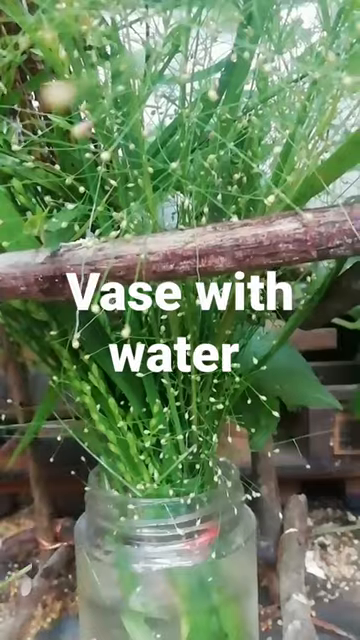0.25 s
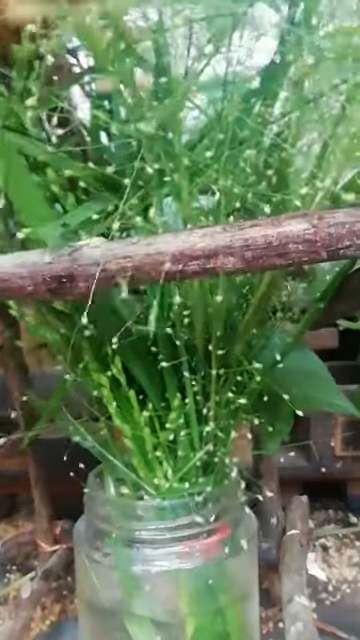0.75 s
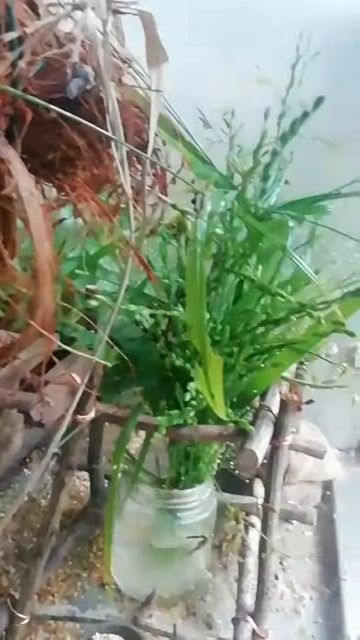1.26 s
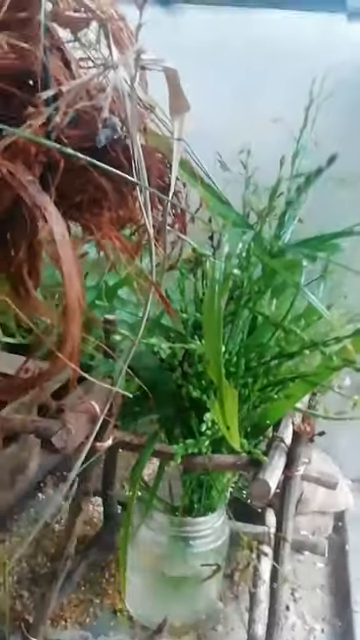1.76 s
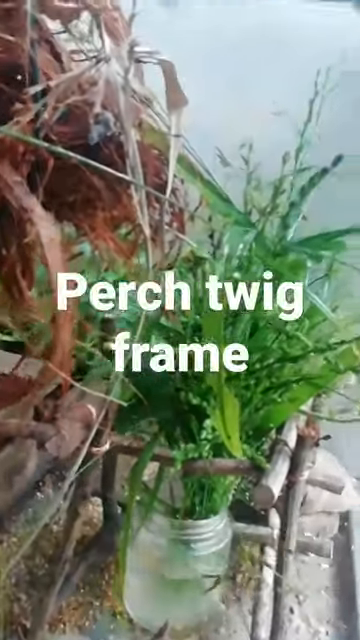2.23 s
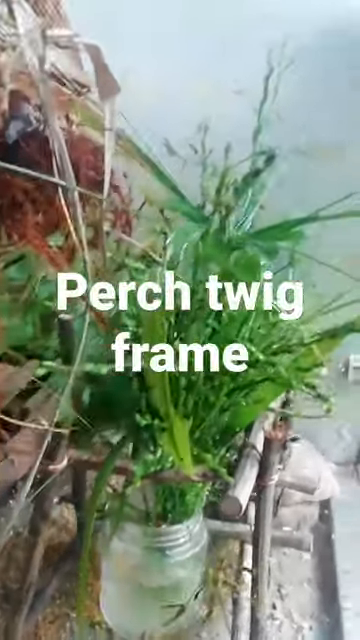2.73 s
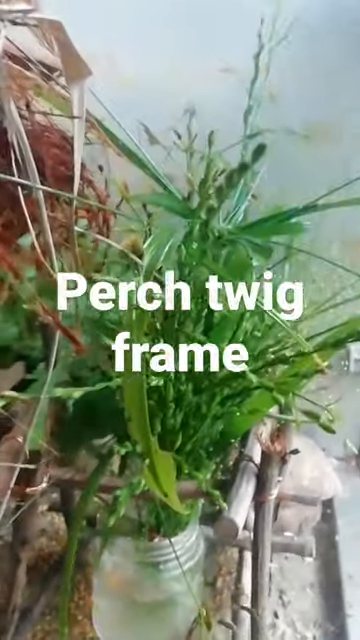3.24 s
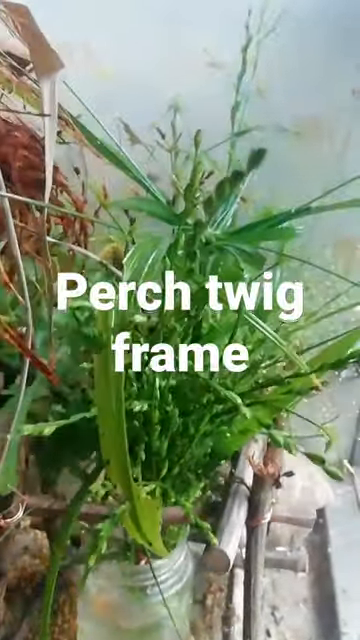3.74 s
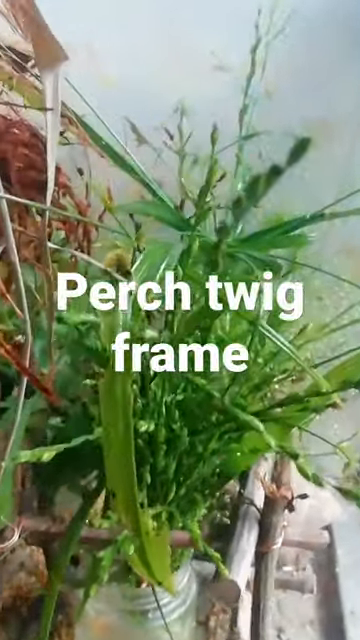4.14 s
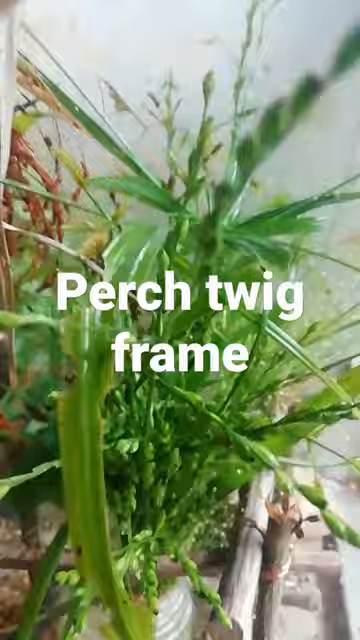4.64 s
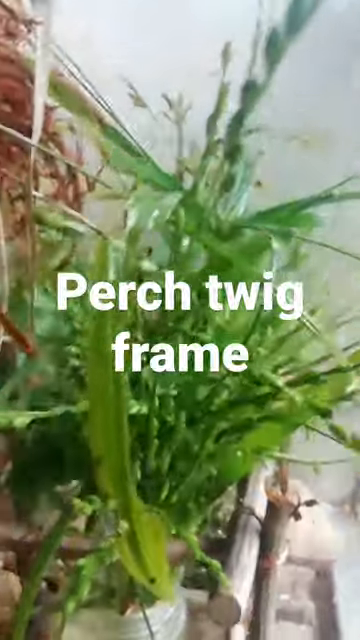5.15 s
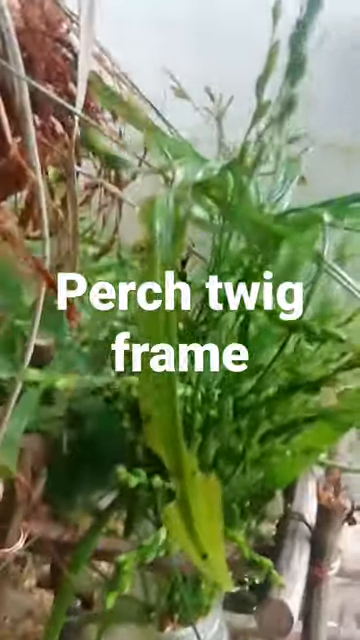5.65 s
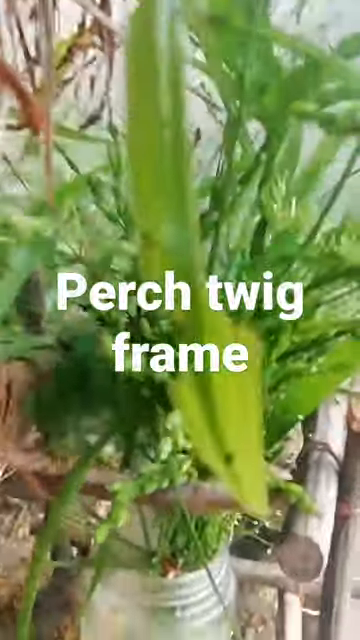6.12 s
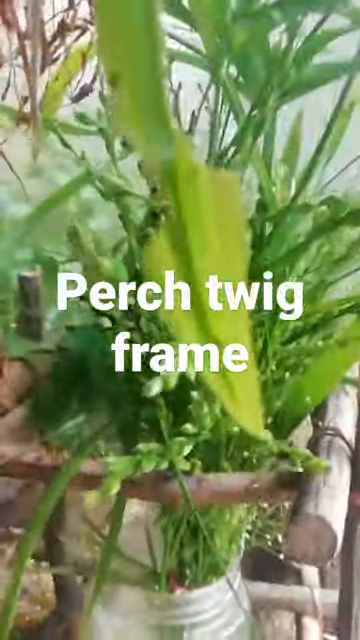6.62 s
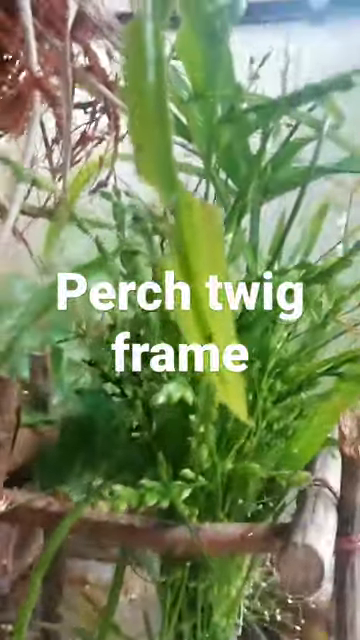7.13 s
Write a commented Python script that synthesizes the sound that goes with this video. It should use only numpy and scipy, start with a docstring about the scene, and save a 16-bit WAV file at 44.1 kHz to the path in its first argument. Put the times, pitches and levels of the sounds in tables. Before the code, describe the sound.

A soft outdoor wash and low rumble lie under sparse, quiet finch cheeps and dry stem rustles. A sudden silent gap follows, then the ambience restarts with a soft low bump. Rustling thickens with small wooden knocks, and the birds become louder: brief buzzy calls between high squealing phrases ending in raspy, reedy syllables. Close, dry stereo with a very short echo; the last squeal is cut off.

```python
"""Finches sing in a small aviary: buzzy pulse-stack notes, high squeals of three partials, the upper two
throbbing, with hoarse tails, clean harmonic stacks, some of them falling, and cheeps.
Birds rustle in dry grass as noise bursts with dull knocks; thin near-sines whistle or hum low.
Shaped noise makes the rumble, outdoor wash, leaves, a band of hiss, one dull scuff and one gust.
The recorder pauses once, leaving a silent gap, and restarts with a slowly settling offset."""
import sys
import numpy as np
from scipy import signal
from scipy.fft import rfft, irfft
from scipy.io import wavfile
from scipy.ndimage import uniform_filter1d

SR = 44100
rng = np.random.default_rng(int(sys.argv[2]) if len(sys.argv) > 2 else 0)


def transcribe(u):
    """Save the signal u as a 16-bit wav file named by the first command-line argument.

    u: samples, shape (n,) or (channels, n), limited to [-1, 1]; the rate is SR.
    q: integer samples, one column per channel.
    """
    v = np.clip(np.atleast_2d(u).T, -1, 1)
    q = np.round(v * 32767).astype(np.int16)
    wavfile.write(sys.argv[1], SR, q)


N = 325458

# Left-right values in dB are positive towards the left.
# Level curves of the steady noise layers. Each row: time in seconds, level in dB.
RUMBLE_LEVEL = [(0.0, -55.5), (1.2, -55.5), (1.75, -53.5), (2.9, -56), (3.6, -53.5), (4.3, -54.5),
                (5.8, -57), (6.25, -54), (6.55, -56.5), (7.3, -55)]
WASH_LEVEL = [(0.0, -48.5), (1.8, -47), (2.1, -52), (3.3, -48), (5.0, -47.5), (6.1, -49), (7.38, -49)]
LEAVES_LEVEL = [(0.0, -51), (1.8, -49), (3.2, -53.5), (4.8, -48), (6.1, -51), (6.7, -45.5), (7.0, -53.5),
                (7.38, -45.5)]
HISS_LEVEL = [(0, -49), (.25, -47), (.4, -52), (.5, -49), (.6, -48.5), (.66, -45), (.74, -55), (.82, -44),
              (.9, -48), (1.02, -45), (1.08, -50), (1.2, -49.5), (1.59, -46), (1.8, -52.5), (3, -53.5),
              (4.3, -56), (7.38, -65)]
# Relative spectra of the noise layers. Each row: frequency in Hz, density in dB per Hz.
RUMBLE_SPECTRUM = [(12, -52), (20, -13), (48, 3.5), (153, -3.5), (226, -11), (283, -7.5), (321, -9.5),
                   (560, -12), (730, -58.5), (1230, -120)]
WASH_SPECTRUM = [(240, -38.5), (400, -8.5), (499, -23), (678, -4.5), (912, -1.5), (1600, -7.5),
                 (2170, -6.5), (2290, -8.5), (5000, -11.5), (6500, -18.5), (11000, -120)]
LEAVES_SPECTRUM = [(2350, -9.5), (4000, -14), (4610, -7), (5050, -9), (8090, 1.5), (9480, -7),
                   (14400, -22.5), (15500, -79)]
HISS_SPECTRUM = [(900, -19.5), (1250, -1.5), (1600, 3), (1950, -2), (2400, -28)]
SCUFF_SPECTRUM = [(300, -41.5), (500, -1), (800, -3), (1400, -15.5), (2200, -41)]
GUST_SPECTRUM = [(30, -30.5), (60, -5.5), (150, -9), (300, -16.5), (450, -20.5), (900, -63), (2000, -110)]
# Stereo likeness of the noise layers. Each row: frequency in Hz, left-right likeness from 0 to 1.
LIKENESS = [(60, 0.99), (150, 0.98), (290, 1), (640, 0.5), (1400, 0.028), (3100, 0.14), (7000, 0.024),
            (15000, 0.045)]
# Stereo balance of the noise layers. Each row: frequency in Hz, left-right in dB.
BALANCE = [(60, 0), (150, 0), (300, -2.5), (600, .5), (1200, -3), (2400, -1.5), (5000, -1), (8000, 1),
           (15000, 0)]
# Swells of the scuff and the gust. One row: level in dB, rise in dB per second, fall in dB per second.
SCUFF_SWELL_RATES = (-47.5, 800, 420)
GUST_SWELL_RATES = (-42, 130, 110)
# Grass rustles. Each row: start in seconds, crackle level in dB before it dies, knock in dB against the
# crackle, time to fall 60 dB in seconds.
GRASS_RUSTLES = [(0.189, -38.5, -9, 0.075), (0.4494, -43, 0, 0.055), (0.638, -44, -9, 0.08),
                 (.799, -50, 6, 0.16), (1.9498, -39, -4, 0.044), (2.163, -42.5, -1, 0.1),
                 (2.3234, -40.5, -2.5, 0.08), (2.4442, -41, 1, 0.11), (2.5777, -37, -3, 0.15),
                 (2.6424, -43, -9, 0.5), (2.7, -41.5, -2, 0.15), (2.8577, -47, 2, 0.44),
                 (3.1451, -44, -3, 0.4), (3.2315, -40.5, -4, 0.24), (3.2693, -37, 0, 0.18),
                 (3.318, -43, 0, 0.29), (3.4165, -41.5, -22, 0.12), (3.453, -43.5, 2.5, 0.42),
                 (3.471, -28, -35, 0.056), (3.483, -38.5, -23, 0.4), (3.7842, -43, 1, 0.19),
                 (3.8567, -46, 2.5, 0.26), (3.997, -42.5, 2, 0.15), (4.242, -37.5, 3, 0.028),
                 (4.436, -39.5, -0.5, 0.44), (4.631, -37.5, -1, 0.1), (4.7914, -37.5, -6, 0.44),
                 (4.87, -38, -8, 0.16), (5.308, -39.5, -4, 0.12), (5.45, -37, -2, 0.12),
                 (5.778, -43.5, 0, 0.25), (5.9987, -44, -25, 0.062), (6.6258, -44, -5, 0.21)]
# Tone colour of dry grass and of the knocking perch. Each row: frequency in Hz, gain in dB.
GRASS_COLOUR = [(3000, -15), (5500, -4), (7500, 7.5), (9500, -2.5), (12000, -13), (15500, -27)]
PERCH_COLOUR = [(500, -25.5), (1000, -10), (1700, -6), (2500, -13), (4500, -12.5), (7000, -33.5)]
# Thin whistling tones, one of them a second high voice beside the last squeal, and low tones.
# Each row: start in seconds, length in seconds, first pitch in Hz, last pitch in Hz, level in dB,
# left-right in dB.
THIN_WHISTLES = [(0.634, 0.04, 2146, 2080, -46.5, 8), (1.087, 0.028, 3100, 3120, -53.5, 11),
                 (1.78, 0.047, 4020, 3970, -53.5, -5), (2.718, 0.062, 2170, 1910, -55, -16),
                 (3.064, 0.2, 4600, 4520, -58, -5), (3.252, 0.11, 1376, 1416, -51, 0),
                 (3.264, 0.035, 1920, 2030, -47, 0), (4.482, 0.079, 6000, 6120, -48, -11),
                 (4.531, 0.093, 6040, 5800, -49, -11), (5.112, 0.023, 4750, 4720, -42, -7),
                 (5.14, 0.031, 4650, 4870, -50, -7), (7.33, .04, 5550, 5830, -35, 10),
                 (5.403, 0.071, 3590, 3530, -57, -3), (5.639, 0.13, 4050, 3800, -54, -15),
                 (6.265, 0.043, 2115, 1820, -46.5, -9)]
LOW_HUMS = [(0.198, 0.12, 289.4, 278, -58.5, -1), (0.797, 0.044, 292, 286, -50.5, -1),
            (1.14, 0.09, 295, 290, -55, -1), (5.04, 0.17, 200.4, 194, -54, -3),
            (6.684, 0.04, 470, 468, -48, -10), (7.039, 0.12, 367, 337, -51.5, -7),
            (7.19, 0.044, 278, 316, -52, -2), (7.19, 0.078, 110, 101, -49, 0)]
# Throat colour. Each row: frequency in Hz, gain in dB.
THROAT_COLOUR = [(500, -27.5), (1100, -2), (1800, -10), (2400, -1), (2900, -5), (3400, -9.5), (4100, -2.5),
                 (5100, -7), (6100, -3.5), (7200, -11.5), (8200, -9.5), (9500, -12.5), (13000, -46)]
# Single calls and opening notes. Each row: start in seconds, length in seconds, level in dB,
# early roughness from 0 to 1, beak resonance in Hz, left-right in dB, thinning below 4 kHz in dB per octave.
CHIRP_NOTES = [(0.561, 0.037, -43.5, 0.4, 4840, -2, -2), (0.794, .04, -55, 0.4, 3200, -10, -9),
               (.965, 0.032, -51, 0.46, 3100, -5, 8), (1.125, 0.041, -43, 0.05, 4300, 5, 0),
               (2.969, 0.05, -42, 1.03, 4040, 0, -3), (3.013, 0.039, -30.5, 0.32, 4400, 1.5, -1),
               (3.151, 0.016, -38.5, 0.6, 4300, 11.5, 7), (3.232, 0.069, -40, 0.6, 4600, 0.5, 1),
               (3.341, 0.011, -34.5, 0.87, 4380, 4, 4), (3.486, 0.054, -34, 0.41, 4100, 2.5, 1),
               (3.923, 0.037, -37, 0.77, 4530, 0.5, -0.5), (4.019, 0.034, -36, 0.77, 4740, -1, -2.5),
               (4.118, 0.048, -43.5, 0.46, 4120, 1, -4), (4.166, 0.038, -32.5, 0.1, 4800, -4, 3),
               (4.616, 0.044, -40, 0.26, 4140, -4, -2.5), (4.73, 0.056, -40.5, 0.44, 2290, -5, 4),
               (4.78, 0.05, -33.5, 0.19, 4700, -3.5, 2.5), (5.574, 0.053, -35.5, 0.34, 3870, -2, 1),
               (6.096, 0.051, -46, 0.96, 3300, -1, 1), (6.144, 0.047, -32, 0.67, 4200, -0.5, 3),
               (6.477, 0.052, -46, 0.8, 2780, -1, -2), (6.536, 0.027, -37, 0.44, 4250, 5, 6),
               (6.951, 0.027, -38, 0.37, 4540, -2, 0), (7.042, 0.033, -37.5, 0.44, 3040, -1.5, 1.5),
               (7.148, 0.052, -42.5, 0.7, 3740, 1, -1.5), (7.2, 0.033, -32, 0.38, 5050, 1, 8)]
# Pitch of each chirp, one value in Hz per note.
CHIRP_PITCHES = [570, 588, 610, 588, 602, 583, 522, 551, 484, 564, 601, 617, 615, 572, 590, 594, 562, 478,
                 610, 588, 606, 577, 588, 588, 567, 565]
# Squeal that opens each song phrase. Each row: start in seconds, squeal length in seconds, rise in seconds,
# octave partial in dB, its swell in dB, lead-in pitch in Hz, body pitch in Hz, fundamental in dB,
# third partial in dB, lead-in in seconds, pitch settling in seconds, midway pitch dip as a share,
# throb depth from 0 to 1, throbs per second, left-right in dB.
SQUEALS = [(3.618, 0.045, 0.0046, -27.5, 2, 2756, 2580, -39, -36.5, 0.0091, 0.014, .008, 0.28, 69, 4),
           (4.301, 0.042, 0.011, -24.5, 1.5, 2680, 2541, -22.5, -30.5, 0.0062, .014, 0.017, 0.27, 85, -7.5),
           (4.914, 0.036, 0.0067, -24, 1.5, 2750, 2570, -27, -32, 0.0089, 0.014, 0.015, 0.4, 156, -3.5),
           (6.658, 0.0335, 0.0043, -19.5, 11, 2970, 2605, -38, -26, .008, 0.0069, 0.0033, 0.45, 56, -0.5),
           (7.342, 0.02, 0.006, -21.5, 7, 2950, 2523, -33.5, -26.5, 0.016, 0.018, 0.0049, 0.24, 106, 4)]
# Hoarse syllables after a squeal. Each row: delay in seconds, length in seconds, pitch sag as a share over
# 0.56 of the note, late roughness from 0 to 1, arch power, treble fading as the beak closes in dB per octave.
SYLLABLES = [(.025, .052, 0, .6, .7, 6), (.128, .03, .02, .8, .7, 6), (.143, .068, .055, .6, .5, 0)]
# How each phrase sings them. One list per phrase, each row: level in dB, early roughness from 0 to 1,
# beak resonance in Hz, thinning below 4 kHz in dB per octave; the last phrase has one syllable.
SYLLABLE_VOICES = [
    [(-34, 0.67, 4340, 4), (-36, 0.86, 4200, 9), (-43, 0.6, 4600, 0)],
    [(-34, 0.8, 4900, 4), (-37.5, 0.8, 4000, 7), (-45, 0.36, 3600, 7)],
    [(-31, 0.86, 5060, 3.5), (-35.5, 0.5, 3800, -0.5), (-43.5, 0.4, 4300, 1)],
    [(-31, 0.69, 3160, 6.5), (-36, 0.8, 4400, -2), (-42.5, 0.66, 3500, 1)],
    [(-26.5, 0.78, 4400, 10)],
]
# Pitch of the syllables. Each row: one pitch in Hz per syllable of that phrase.
SYLLABLE_PITCHES = [(553, 680, 630), (628, 660, 620), (610, 670, 636), (589, 670, 626), (600,)]
# Clean stacks. Each row: start in seconds, length in seconds, first fundamental in Hz, last fundamental in Hz,
# lateness of the glide as a power, number of the lowest partial heard.
CLEAR_STACKS = [(3.716, .038, 993, 1030, 4, 3), (4.398, .044, 993, 1006, 1, 3),
                (5.01, .04, 1007, 997, 2, 3), (6.753, .044, 1000, 1027, .5, 3)]
FALLING_STACKS = [(3.765, .06, 662, 595, 1, 5), (4.452, .066, 650, 598, 1, 5),
                  (5.052, .066, 667, 607, 1, 5), (6.806, .068, 662, 592, 1, 5)]
CHEEP_STACKS = [(6.148, .042, 592, 572, 1, 2), (6.533, .032, 587, 584, 1, 2), (7.203, .034, 570, 568, 1, 2)]
# Partials of those stacks from the lowest up. One list per stack, each row: level in dB,
# growth through the note in dB, left-right in dB.
CLEAR_VOICES = [
    [(-47, -2, -2), (-34, 10, -6), (-36.5, 13, -9), (-36, -3, 1), (-58, -14, -2), (-44.5, -4, 8)],
    [(-44, 3, -3), (-31, 6, -5.5), (-41, 27, -9), (-37.5, -3, 11), (-40, -2, 0), (-41, 10, -3)],
    [(-45, 3, -2), (-32, -2, -3), (-39, 25, -11), (-33, -7, 6.5), (-42, -16, 2), (-48, -1, 6)],
    [(-39.5, -2, 0), (-33, 11, -11.5), (-35, 10, -2), (-31, -15, 13), (-45, -8, -13), (-46, -14, -6)],
]
FALLING_VOICES = [
    [(-57, -17, -7), (-50, 8, -7), (-48, 5, -12), (-56, 2, -3)],
    [(-57, 17, -3), (-47.5, 2, 4), (-47, 9, 11), (-50, 5, -1)],
    [(-48.5, -2, -2), (-47, 6, 6), (-47, -3, 6), (-49, -11, -3)],
    [(-42.5, 11, 3), (-59, 1, 1), (-46, 2, -10), (-51, 28, -2)],
]
CHEEP_VOICES = [
    [(-53, -9, 4), (-53, 2, 7), (-53, 0, 3), (-40, -3, 9), (-48, -1, 3), (-37.5, -10, 10), (-42, -5, 0),
     (-44, -21, -5), (-48, -7, -8)],
    [(-46.5, -3, -9), (-54, 0, -2), (-47, 13, -10), (-39, 4, -12), (-45, 14, 8), (-36, -6, -15),
     (-49, -14, 0), (-34.5, 3, 8), (-40, -1, -14)],
    [(-45, -11, -8), (-56, -4, 7), (-59, 0, -2), (-41, 8, -5), (-55, -5, -6), (-39, 8, -7), (-48, 6, 4),
     (-45, -20, 13), (-39.5, -23, 9)],
]

LAG = 26  # samples by which the left microphone trails the right
GRASS_PAN_DB, GRASS_SPREAD_DB = -2.5, 3  # left-right place of the grass and chance scatter of the rustles
CALL_SAG, ROUGH_END = .006, .75  # chirps: pitch sag as a share over 0.56 of the note; late roughness 0-1
CREST_CLEAR, CREST_ROUGH = 0.84, 0.072  # place 0-1 of the loudest moment before limiting: late if clear
# chance spread of a partial's level, its drift through the note, and its phase in radians
UNEVEN_DB, WANDER_DB, SCATTER = 2.0, 3.0, .9
LEAD_DB, SQUEAL_FALL_S = -37.5, 0.0067  # fundamental as the squeal body starts; squeal release
SCUFF_S, GUST_S = (3.28, 3.4), (6.24, 6.29)  # loudest stretch, from and to
PAUSE_S, FADE_S = (1.2155, 1.593), .022  # pause from and to; fade into it
OFFSET, SETTLE_S = -.043, .1625  # offset at full scale 1; its settling time
EDGE_HZ = 15650  # upper band limit


def amp(db):
    """Turns dB into an amplitude factor."""
    return 10 ** (np.asarray(db) / 20)


def evened(x):
    """Scales a signal to an RMS of one."""
    return x / np.sqrt(np.mean(x ** 2) + 1e-20)


def read(points, hz):
    """Reads a curve between its points on a log-frequency scale."""
    f, value = np.transpose(points)
    return np.interp(np.log(hz + 1), np.log(f + 1), value)


def add(mix, s, sound):
    """Lays a stereo sound into the mix at s seconds, cut at the end of the mix."""
    part = mix[:, round(s * SR):][:, :sound.shape[1]]
    part += sound[:, :part.shape[1]]


def panned(x, pan_db):
    """Splits a level difference evenly over left and right."""
    return x * amp([[pan_db / 2], [-pan_db / 2]])


def coloured(x, gain):
    """Filters by gain(Hz) along the last axis."""
    return irfft(rfft(x) * gain(np.fft.rfftfreq(x.shape[-1], 1 / SR)), x.shape[-1])


def bed(spectrum, points, patchy_db, flicker_db, size):
    """Random short-time spectra with drifting patches and wide-band flicker follow a level curve."""
    frames, hz = 4 * N // size + 8, np.fft.rfftfreq(size, 1 / SR)
    a, b, c, d, patches = rng.standard_normal((frames, len(hz), 5)).T
    patches = uniform_filter1d(patches, size=size // 64, axis=0)
    patches = evened(uniform_filter1d(patches, size=10240 // size, axis=1))
    flicker = evened(uniform_filter1d(rng.standard_normal(frames), size=6144 // size))
    same = np.clip(read(LIKENESS, hz), -1, 1)[:, None]
    right = a + 1j * b
    # the deep bass arrives together
    late = np.exp(-2j * np.pi * hz * LAG / SR * (hz > 200))[:, None]
    left = same * late * right + np.sqrt(1 - same ** 2) * (c + 1j * d)
    z = np.array([left, right]) * amp(patchy_db * patches + flicker_db * flicker)
    x = signal.istft(z, nperseg=size, noverlap=3 * size // 4)[1][:, :N]

    def side(v, sign):
        return coloured(v, lambda f: amp(read(spectrum, f) + sign * read(BALANCE, f) / 2))

    balanced = np.array([side(x[0], 1), side(x[1], -1)])
    s, db = np.transpose(points)
    return evened(balanced) * amp(np.interp(np.arange(N) / SR, s, db))


def rustle(s, db, thud_db, t60):
    """Dry stems crackle in a dying burst while the perch gives a dull knock."""
    t = np.arange(8192) / SR
    a, b, grains = rng.standard_normal((3, 2, 8192))
    crackle = evened(coloured(a * amp(1.7 * grains), lambda f: amp(read(GRASS_COLOUR, f))))
    knock = evened(coloured(b, lambda f: amp(read(PERCH_COLOUR, f))))
    fall = np.minimum(t / 0.0013, 1) * amp(-60 * t / max(t60, .02))
    pan_db = GRASS_PAN_DB + GRASS_SPREAD_DB * rng.standard_normal()
    return s, panned(amp(db) * fall * (crackle + amp(thud_db) * knock), pan_db)


def aviary(x, t60):
    """The aviary answers with sparse taps of random sign that die away, other taps for each microphone."""
    at = np.arange(300, 16000, 20) + rng.integers(0, 20, (2, 785))
    taps = np.zeros((2, 16040))
    np.put_along_axis(taps, at, rng.choice([-1., 1.], at.shape) * amp(-60 * at / SR / t60), 1)
    return signal.fftconvolve(x.mean(0)[None], taps / np.linalg.norm(taps[0]), axes=1)[:, :N]


def tone(s, length, first_hz, last_hz, db, pan_db, waver):
    """A thin near-sine glides and wavers in pitch and level."""
    u = np.arange(round(length * SR)) / (length * SR)
    noise = rng.standard_normal((2, 12000))
    drift, sway = (evened(uniform_filter1d(v, size=110))[:len(u)] for v in noise)
    hz = (first_hz + (last_hz - first_hz) * u ** 0.94) * (1 + waver * drift)
    x = amp(db + 5.5 * sway) * np.sin(2 * np.pi * np.cumsum(hz) / SR)
    return s, panned(x * np.sqrt(np.sin(np.pi * u)), pan_db)


def nearby(x, echo_db):
    """Each note gets a few random early echoes, different in each microphone, so partials differ by side."""
    at, size = rng.integers(30, 500, (2, 8)), rng.standard_normal((2, 8))
    taps = np.zeros((2, 500))
    np.put_along_axis(taps, at, amp(echo_db) * size, 1)
    taps[[0, 1], [LAG, 0]] = 1  # direct sound
    return signal.fftconvolve(x[None], taps / np.linalg.norm(taps, axis=1, keepdims=True), axes=1)


def note(pitch_hz, s, length, db, rough_early, beak_hz, pan_db, thin_db, sag, rough_late, power, closing_db):
    """A pulse stack from the syrinx shifts in roughness as it ends, and leaves through throat and beak."""
    noise = rng.standard_normal((2, 4096))
    u = np.arange(min(round(length * SR), 4096)) / (length * SR)
    hz = pitch_hz * (1 - sag * (u - .5) / .56)
    rough = np.clip(np.interp(u, [.62, .92], [rough_early, rough_late]), 0, 1)
    wobble = evened(uniform_filter1d(noise[0], size=120))[:len(u)]
    turns = np.cumsum(hz * (1 + 0.049 * rough * wobble)) / SR
    size, phase = rng.standard_normal((2, 32))
    drift = rng.standard_normal((32, 5))

    def partial(k):
        wander_db = WANDER_DB * np.interp(u, np.linspace(0, 1, 5), drift[k])
        closed_db = closing_db * (u - .4) * np.log2(np.clip(k * pitch_hz / 4800, .8, 2))
        level = amp(UNEVEN_DB * size[k] + wander_db - closed_db)
        return level * np.cos(2 * np.pi * k * turns + SCATTER * phase[k])

    folds = sum(partial(k) for k in range(1, int(12000 // pitch_hz)))
    puffs = (0.39 + np.exp(-(turns % 1) / 0.083)) * noise[1, :len(u)]  # a breath burst each cycle
    drive = (1 - rough) * evened(folds) + rough * evened(puffs)
    loudest = CREST_CLEAR + (CREST_ROUGH - CREST_CLEAR) * rough_early
    bend = np.log(.5) / np.log(np.clip(loudest, .1, .9))  # puts the crest of the arch at its place
    shape = np.sin(np.pi * u ** bend) ** power
    dull_db = 0.79 * min(db + 33, 0)  # per octave above 4 kHz: soft notes carry less treble

    def throat_and_beak(f):
        treble_db = dull_db * np.log2(np.maximum(f / 4000, 1))
        thinning_db = thin_db * np.log2(np.clip(f / 4000, .1, 1))
        resonance = 1 + 2.2 / (1 + ((f - beak_hz) / 600) ** 2)
        return amp(read(THROAT_COLOUR, f) + treble_db + thinning_db) * resonance

    voice = coloured(np.pad(drive * shape, 64), throat_and_beak)
    return s, panned(nearby(amp(db) * evened(voice), echo_db=-14), pan_db)


def swell(stretch, db, rise, fall):
    """Level points of a sound that grows, holds and dies at steady rates."""
    start, stop = stretch
    return [(start - 60 / rise, db - 60), (start, db), (stop, db), (stop + 60 / fall, db - 60)]


def squeal(s, length, rise, db, swell_db, lead_hz, body_hz, low_db, third_db, lead, settle, dip, depth, rate,
           pan_db):
    """A soft lead-in glides down to three partials on a shaking pitch; the upper two throb unevenly."""
    t = np.arange(-lead, length + SQUEAL_FALL_S, 1 / SR)
    u = np.clip(t / length, 0, 1)
    noise = rng.standard_normal((2, 6000))
    shake, throb = (evened(uniform_filter1d(v, size=130))[:len(t)] for v in noise)
    hz = body_hz + (lead_hz - body_hz) * np.exp(-((t + lead) / settle) ** 2)
    bend = 1 + 0.023 * depth * shake - dip * np.cos(2 * np.pi * (u - .55))
    turn = 2 * np.pi * np.cumsum(hz * bend) / SR
    end = np.clip((length + SQUEAL_FALL_S - t) / SQUEAL_FALL_S, 0, 1)
    growth = amp(swell_db * (np.minimum(t / length / 0.79, 1) - 1.0))
    body = np.clip(t / rise, 0, 1) ** 2 * growth * end
    low_level = amp(np.interp(t, [0, length / 2, length], [LEAD_DB, low_db, low_db - 7]))
    low = np.clip((t + lead) / .008, 0, 1) * low_level * amp(2.5 * shake) * end
    beat = amp(3 * depth * throb) * (1 + depth * np.sin(2 * np.pi * rate * t + .6 * throb))
    octave = amp(db) * np.sin(2 * turn)
    third = amp(third_db) * np.sin(np.pi * u) * np.sin(3 * turn)
    x = np.sqrt(2) * (beat * body * (octave + third) + low * np.sin(turn))  # levels are RMS
    return s - lead, panned(nearby(x, echo_db=-15), pan_db)


def stack(s, length, first_hz, last_hz, bend, lowest, partials, rise, fall, sway_db):
    """A clean harmonic note: every partial swells or fades and sways by itself and leans to its own side."""
    u = np.arange(round(length * SR)) / (length * SR)
    shake = evened(uniform_filter1d(rng.standard_normal(4096), size=150))[:len(u)]
    hz = (first_hz + (last_hz - first_hz) * u ** bend) * (1 + .0015 * sway_db * shake)
    turn = 2 * np.pi * np.cumsum(hz) / SR
    sway, phase = rng.standard_normal((12, 7)), SCATTER * rng.standard_normal(12)
    x = np.zeros((2, len(u)))
    for k, (db, growth_db, pan_db) in enumerate(partials):
        swaying_db = sway_db * np.interp(u, np.linspace(0, 1, 7), sway[k])
        level = amp(db + growth_db * (u - .5) + swaying_db)
        x += panned(level * np.cos((lowest + k) * turn + phase[k]), pan_db)
    x *= np.sqrt(2) * np.clip(np.minimum(u / rise, (1 - u) / fall), 0, 1)  # levels are RMS
    return s, np.array([np.pad(x[0], (LAG, 0)), np.pad(x[1], (0, LAG))])


def scene():
    """Mixes the birds, their echo in the aviary and the noise layers."""
    birds = np.zeros((2, N))
    for hz, row in zip(CHIRP_PITCHES, CHIRP_NOTES):
        add(birds, *note(hz, *row, sag=CALL_SAG, rough_late=ROUGH_END, power=0.56, closing_db=4.0))
    for opening, voices, pitches in zip(SQUEALS, SYLLABLE_VOICES, SYLLABLE_PITCHES):
        add(birds, *squeal(*opening))
        s, pan_db = opening[0], opening[-1]
        for syllable, voice, hz in zip(SYLLABLES, voices, pitches):
            delay, length, sag, *ending = syllable
            db, rough, beak_hz, thin_db = voice
            add(birds, *note(hz, s + delay, length, db, rough, beak_hz, pan_db, thin_db, sag, *ending))
    # rise and fall are shares of the note's length
    for rows, voices, rise, fall, sway_db in [(CLEAR_STACKS, CLEAR_VOICES, .36, .13, 3.3),
                                              (FALLING_STACKS, FALLING_VOICES, .2, .2, 4.5),
                                              (CHEEP_STACKS, CHEEP_VOICES, .3, .3, 3)]:
        for row, partials in zip(rows, voices):
            add(birds, *stack(*row, partials, rise, fall, sway_db))
    for row in THIN_WHISTLES:
        add(birds, *tone(*row, waver=.011))
    for row in LOW_HUMS:
        add(birds, *tone(*row, waver=0.035))
    for row in GRASS_RUSTLES:
        add(birds, *rustle(*row))
    scuff_level = swell(SCUFF_S, *SCUFF_SWELL_RATES)
    gust_level = swell(GUST_S, *GUST_SWELL_RATES)
    beds = bed(RUMBLE_SPECTRUM, RUMBLE_LEVEL, patchy_db=1.0, flicker_db=.5, size=2048)
    beds += bed(WASH_SPECTRUM, WASH_LEVEL, patchy_db=2.0, flicker_db=0.57, size=512)
    beds += bed(LEAVES_SPECTRUM, LEAVES_LEVEL, patchy_db=1.6, flicker_db=0.5, size=512)
    beds += bed(HISS_SPECTRUM, HISS_LEVEL, patchy_db=1.5, flicker_db=1.0, size=512)
    beds += bed(SCUFF_SPECTRUM, scuff_level, patchy_db=1.5, flicker_db=1.2, size=512)
    beds += bed(GUST_SPECTRUM, gust_level, patchy_db=2.0, flicker_db=1.5, size=1024)
    return birds + amp(-10) * aviary(birds, t60=.12) + beds


def record(dry):
    """The sound fades into the pause; at the restart the input offset drains away; then the band limit."""
    t = np.arange(N) / SR
    stop, start = PAUSE_S
    on = np.clip((stop - t) / FADE_S, 0, 1) ** 2 + np.clip((t - start) / .002, 0, 1)
    after = np.maximum(t - start, 0)
    on = on * amp(-4.0 * (t > start) * np.clip(1 - after / 0.18, 0, 1))  # the input gain climbs back
    offset = OFFSET * np.clip(after / .002, 0, 1) * np.exp(-(after / SETTLE_S) ** 1.5)
    lowpass = signal.firwin(511, EDGE_HZ, window=("kaiser", 9), fs=SR)
    return signal.oaconvolve(dry * on + offset, lowpass[None], "same")


dry = scene()
out = record(dry)
transcribe(out)
```